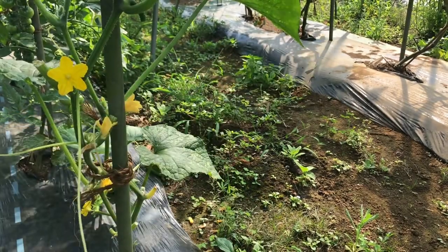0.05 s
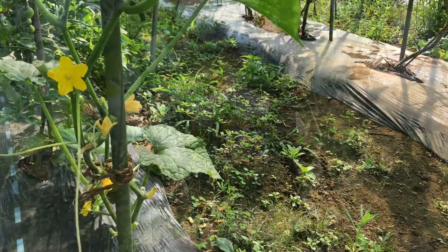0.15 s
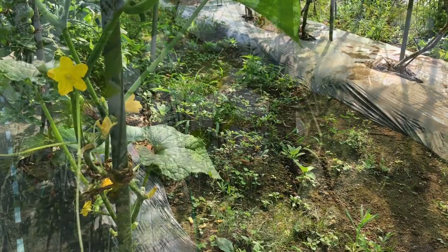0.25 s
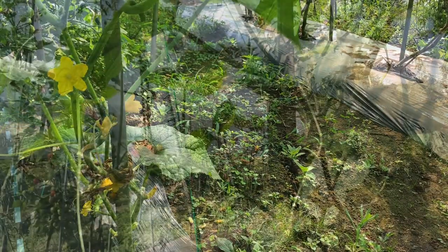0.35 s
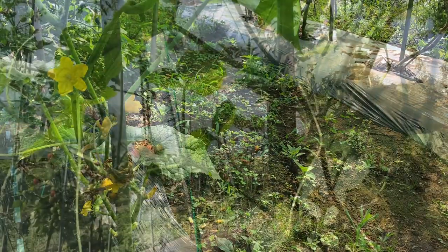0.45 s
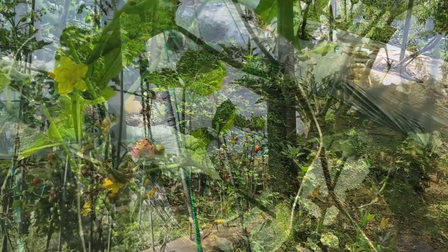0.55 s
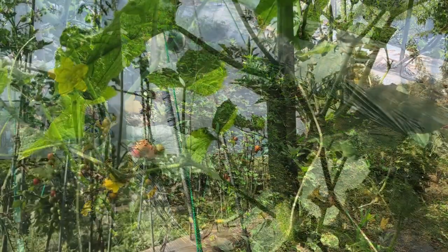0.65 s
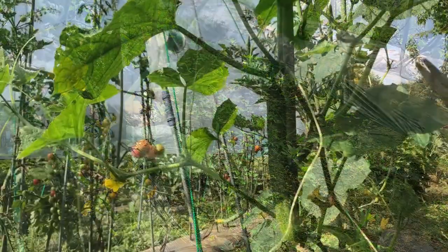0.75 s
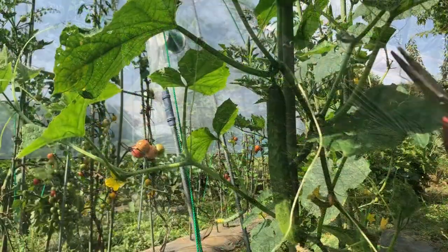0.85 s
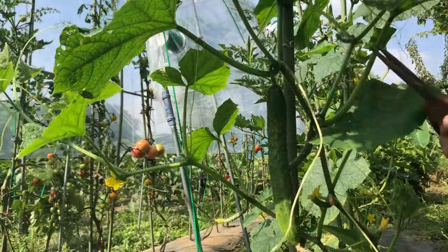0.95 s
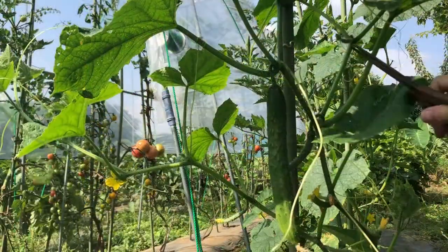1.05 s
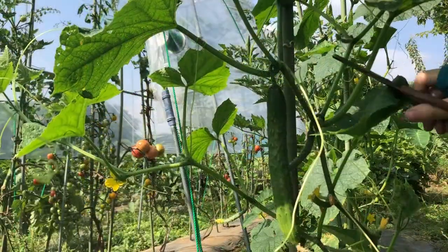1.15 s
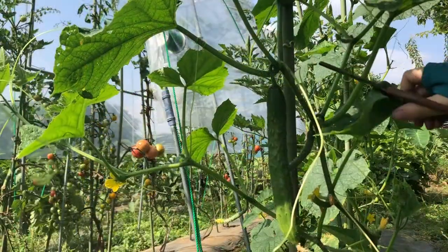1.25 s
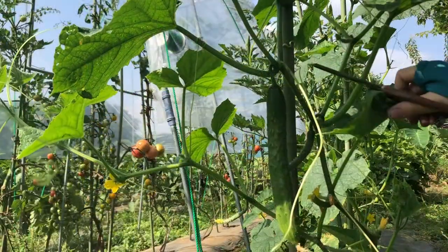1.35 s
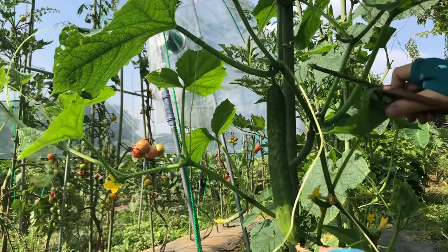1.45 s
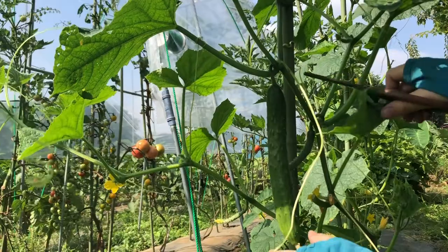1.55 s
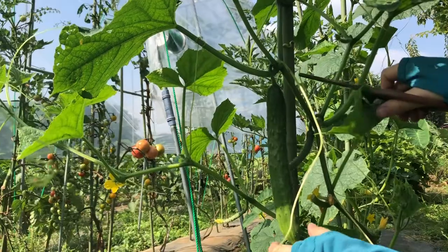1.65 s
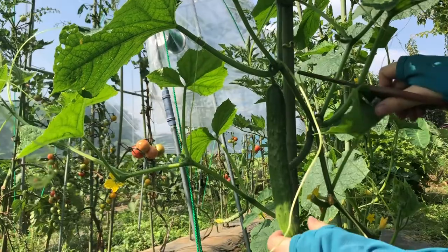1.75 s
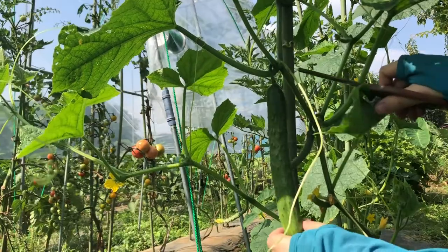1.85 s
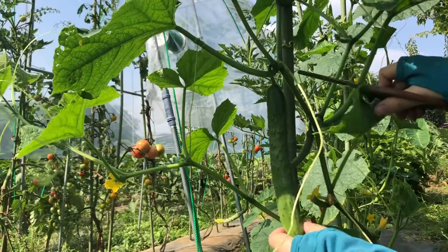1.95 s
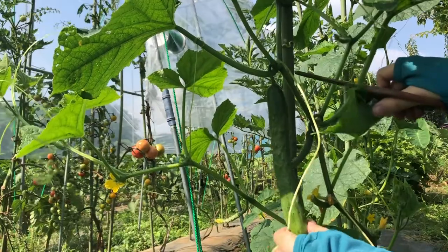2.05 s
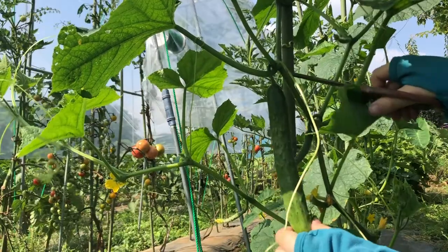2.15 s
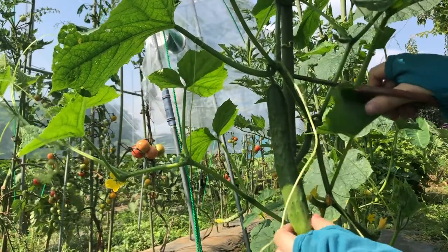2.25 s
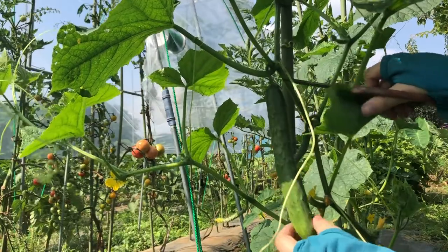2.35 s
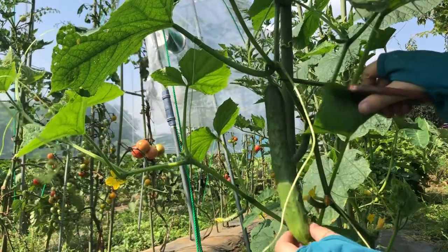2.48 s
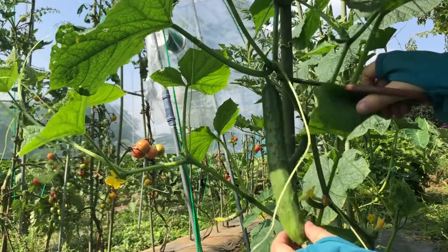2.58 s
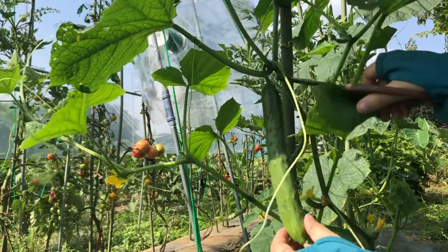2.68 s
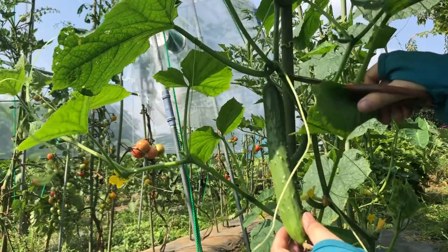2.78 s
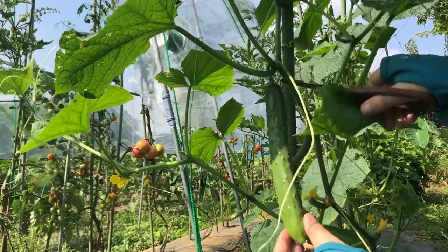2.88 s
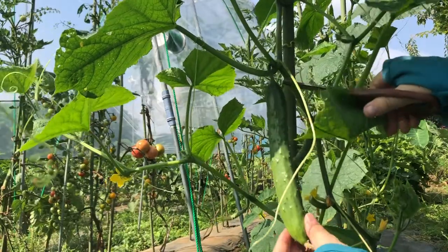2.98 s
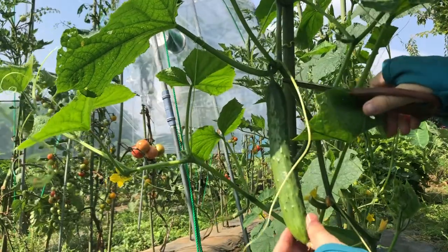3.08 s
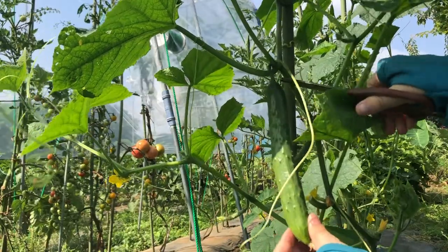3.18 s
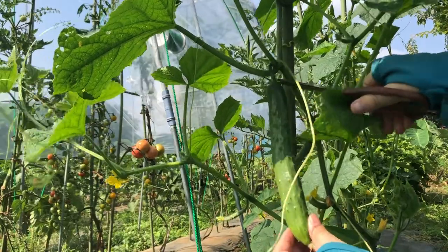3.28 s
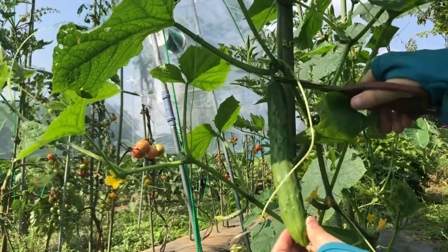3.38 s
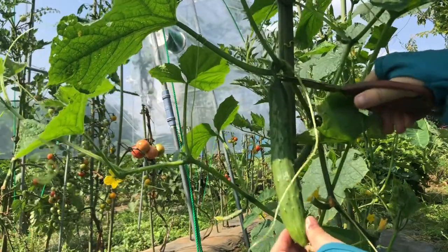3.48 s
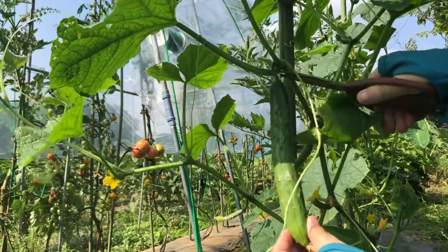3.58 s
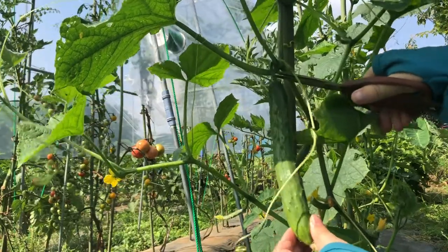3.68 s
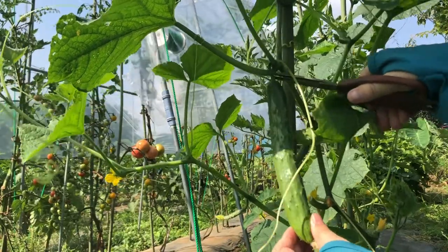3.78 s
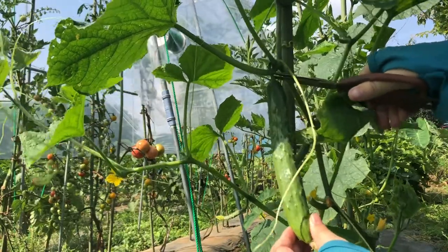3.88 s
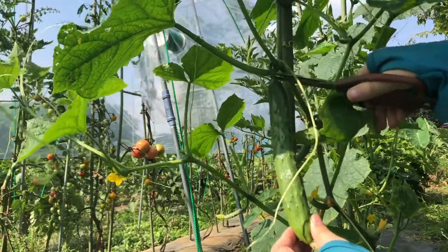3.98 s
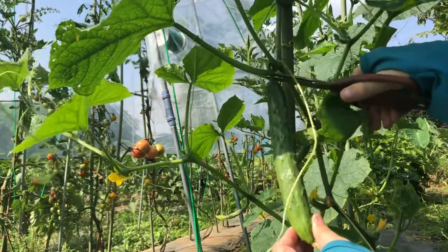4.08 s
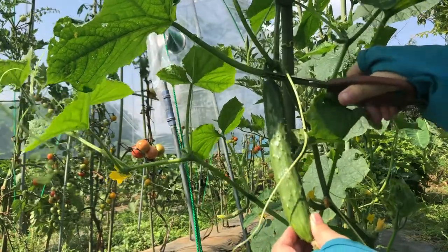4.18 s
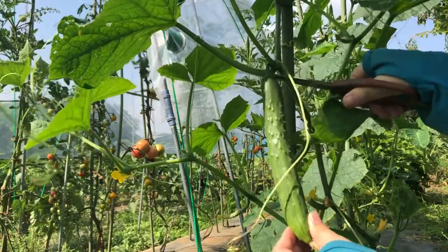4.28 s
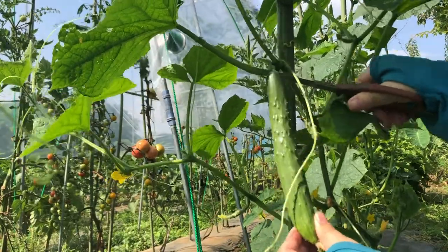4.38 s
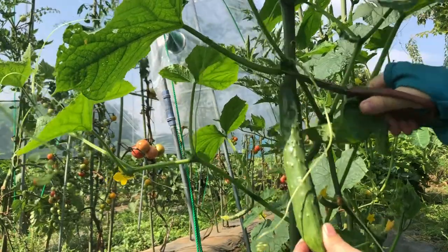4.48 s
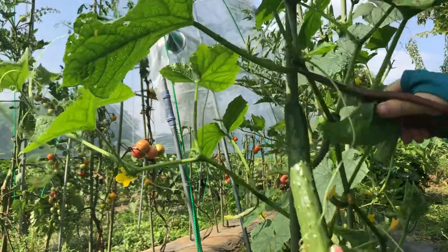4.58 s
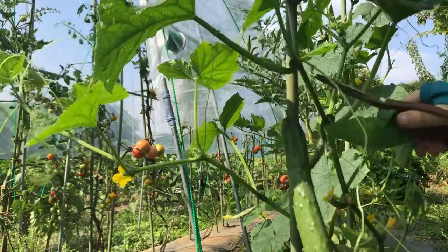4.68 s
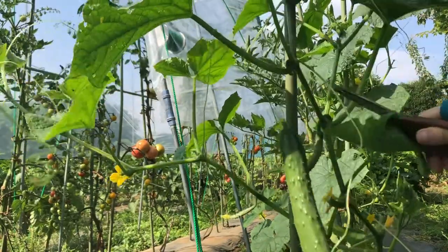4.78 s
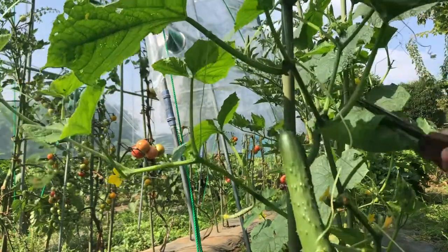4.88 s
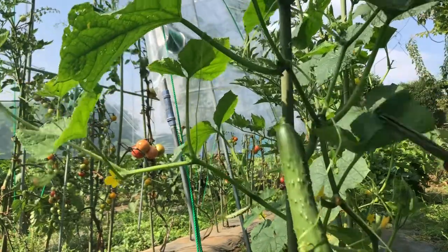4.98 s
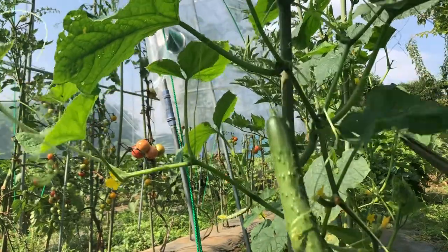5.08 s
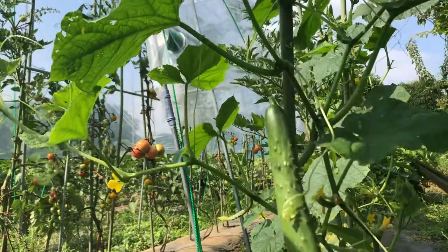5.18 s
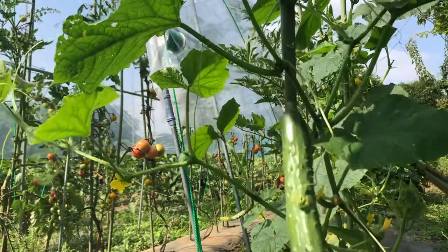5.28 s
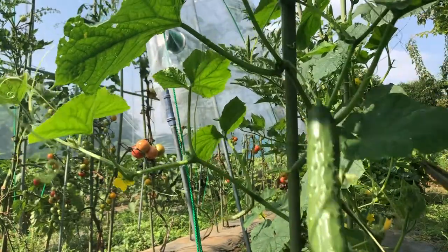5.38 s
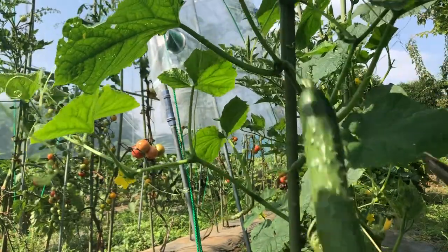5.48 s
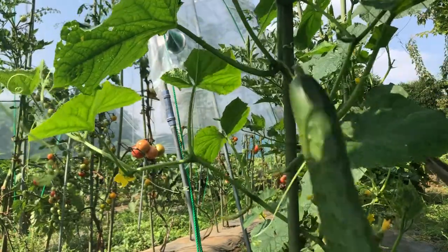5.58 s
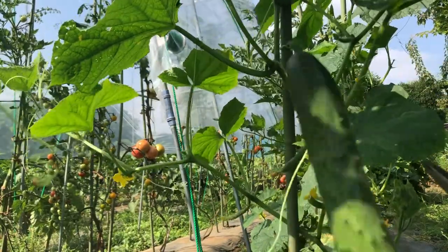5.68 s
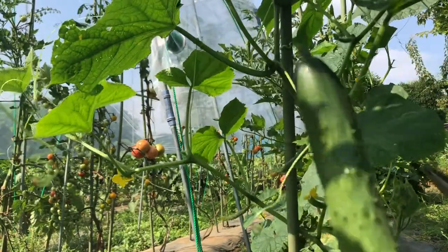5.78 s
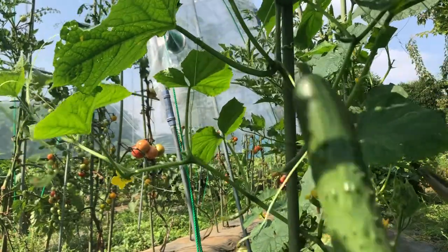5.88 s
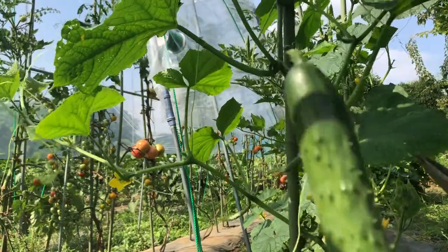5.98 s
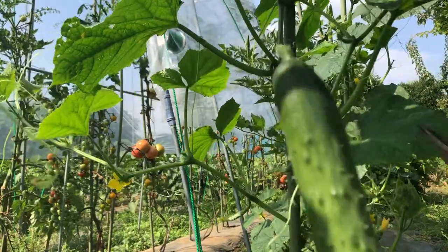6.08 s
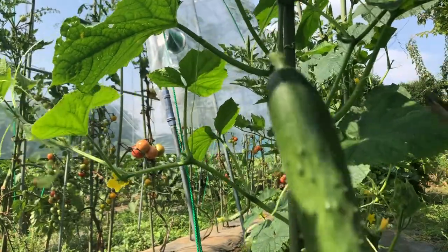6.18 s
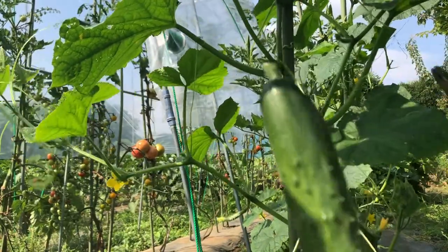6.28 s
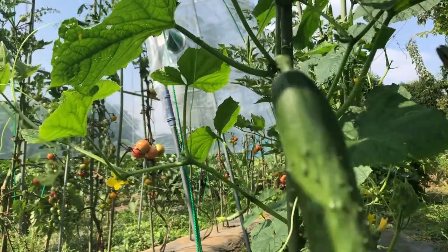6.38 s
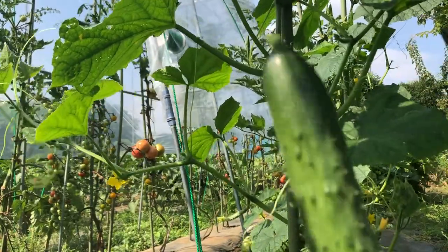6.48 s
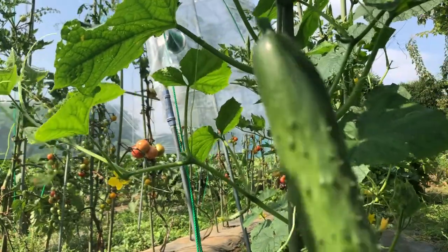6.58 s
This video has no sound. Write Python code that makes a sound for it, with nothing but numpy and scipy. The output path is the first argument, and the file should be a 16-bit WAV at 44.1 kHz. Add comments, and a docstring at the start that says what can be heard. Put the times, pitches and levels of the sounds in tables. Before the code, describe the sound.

A soft rush fades and a far bird calls faintly as insects settle into a fine, even chirr outdoors. Quiet, scratchy rustles and small dry ticks come from a cucumber vine being handled right by the microphone. Past the middle, garden shears crunch through the stem and snap shut once, loud and crisp. A little more leaf crinkling follows, leaving the insects and a low, distant rumble.

```python
"""A summer vegetable garden, one microphone close to a cucumber vine. At first a soft midrange rush fades out
and a far bird calls faintly, while the insect chirr rises to a steady level over a low distant rumble. Sleeves
brush the bristly leaves, stalks tick, and from about 2 s a hand holds and tugs the fruit. At 4.2 s steel shears
crunch through the stalk and snap shut once. The cucumber is drawn out through the leaves and the plant settles."""
import sys
import numpy as np
from scipy.fft import rfft, irfft, next_fast_len
from scipy.io import wavfile
from scipy.ndimage import map_coordinates

SR = 44100
rng = np.random.default_rng(int(sys.argv[2]) if len(sys.argv) > 2 else 0)


def unload_wav(signal):
    """Save mono or channel-first audio to the path in sys.argv[1] as 16-bit WAV at rate SR, clipped to [-1, 1]."""
    wavfile.write(
        sys.argv[1],
        SR,
        np.round(np.clip(np.atleast_2d(signal).T, -1, 1) * 32767).astype(np.int16),
    )


N = 292691

# Spectra of the garden, far off and all around. Each row: frequency in Hz, relative level in dB.
RUMBLE_SPECTRUM = [(20, -39), (32, -14), (48, 0), (75, 1), (105, 1.5), (128, -2.5), (165, 0.5), (210, -8.5),
                   (260, -9.5), (350, -20.5), (600, -43)]
AIR_SPECTRUM = [(150, -12.5), (350, 3.5), (550, 0.5), (1100, -3.5), (1700, -7.5), (2600, -10), (5000, -18),
                (15000, -33)]
OPENING_RUSH_SPECTRUM = [(250, -12), (800, 0), (1500, 6), (2200, -3), (4000, -13), (10000, -26)]
INSECT_SPECTRUM = [(4200, -31), (4900, -18.5), (5400, -7.5), (5850, -2), (6600, -2.5), (7400, -1.5),
                   (8300, -0.5), (9000, -5), (9700, -13.5), (10500, -24), (12000, -49)]
# Tones of a far machine. Each row: frequency in Hz, rms level in dB.
DRONE_TONES = [(167.5, -67.5), (200, -63)]
# Syllables of the far bird. Each row: start in seconds, length in seconds, pitch in Hz, level in dB.
BIRD_SYLLABLES = [(0.515, .1, 980, -62), (0.649, 0.11, 1060, -60), (0.73, 0.089, 1117, -65),
                  (.825, 0.041, 1194, -69)]

# Spectra of the plant, close to the microphone. Each row: frequency in Hz, relative level in dB.
BRUSH_SPECTRUM = [(800, -33), (2500, -12.5), (5000, 3), (7000, 2), (10500, 1), (13000, -1), (15800, -3)]
BRISTLE_SPECTRUM = [(2500, -15), (3400, -14), (3800, 0), (4400, -0.5), (5200, -2.5), (7000, -10),
                    (11000, -32.5)]
LEAF_SPECTRUM = [(300, -10), (900, -10), (1800, -5), (2400, -5.5), (2650, -3.5), (2900, 0.5), (3500, -7),
                 (4100, -6), (6000, -34)]
RASP_SPECTRUM = [(2000, -20), (2900, 0), (3600, -10), (4600, -2), (5400, 0), (6200, -6), (8000, -20)]
RUB_SPECTRUM = [(250, 0), (450, 5), (700, -3), (1200, 1), (1900, -4.5), (3000, -16), (5000, -26)]
CRUNCH_SPECTRUM = [(500, -29), (1000, -25), (1400, -16), (2200, 6), (3200, -3), (4000, -2), (4600, -10),
                   (6000, -2), (9000, 2.5), (11500, -5.5), (15500, 1)]
FOLIAGE_ECHO_SPECTRUM = [(250, -11), (600, 1), (1000, -21), (2200, -11), (4500, -8), (6200, -1), (10500, 0),
                         (13000, 0), (16000, -11)]
# The fruit is tugged, then drawn out. Each row: start in seconds, length in seconds, level in dB.
FRUIT_TUGS = [(1.154, 0.13, -69), (2.78, 0.13, -64), (3.15, 0.067, -66.5), (3.303, .06, -69),
              (4.049, 0.037, -60.5), (4.14, 0.056, -62.5), (4.654, 0.075, -62), (4.897, 0.095, -69),
              (5.817, .13, -67), (6.037, 0.34, -67)]
# Stalks and leaves ticking. Each row: start in seconds, level in dB (the peak lies 1 dB above it),
# pitch in Hz, 60 dB decay time in seconds.
STALK_TICKS = [(.977, -47, 1700, 0.034), (1.708, -44.5, 3200, 0.018), (2.0406, -35, 5100, .009),
               (2.108, -40, 4800, .01), (2.244, -43.5, 3400, 0.016), (2.789, -48, 1600, .015),
               (2.819, -47, 4200, .012), (3.454, -48, 3300, 0.015), (3.623, -45, 4050, .012),
               (4.068, -47, 2130, 0.014), (4.131, -38, 4700, .013), (4.186, -45, 2590, 0.011),
               (4.495, -48, 1900, 0.031), (4.823, -41.5, 3300, .02), (4.919, -41, 2900, .012),
               (4.94, -38, 3000, .012), (4.966, -40, 2900, .015)]
# A big leaf gives way as the hand pushes through the vine. # Each row: start in seconds, length in seconds,
# level in dB.
LEAF_BENDS = [(1.115, .095, -66), (4.9, .085, -56.5)]
# Hand and sleeve moving through the vine. Each row: start in seconds, length in seconds,
# strength of brushing in dB, strength of bristle scraping in dB relative to the brushing.
SLEEVE_STROKES = [(.09, 0.072, -67, 2), (.925, .22, -67, -6), (1.135, .1, -70, 11), (1.28, .12, -73, 1),
                  (1.53, .15, -72, -3), (1.67, .085, -64.5, -2), (2.03, .185, -58, -3.5),
                  (2.24, .07, -58, -4), (2.33, .125, -56.5, -4), (2.47, .25, -64, -2), (2.78, .105, -63, 5),
                  (2.89, .11, -71, 1), (3.135, .09, -63.5, -1), (3.255, .085, -63.5, 4),
                  (3.48, .025, -66, 2), (3.535, .085, -65, 1), (3.66, .15, -70, 2), (3.965, .11, -66, 0),
                  (4.1, .17, -64.5, 0), (4.37, .04, -71, 6), (4.45, .05, -66, -3), (4.51, .11, -72, 7),
                  (4.635, .11, -64, -1), (4.735, .27, -58, -4), (5.05, .15, -74, -3),
                  (5.37, .025, -70, -10), (5.83, .08, -76, 1), (6.01, .11, -72, 2)]
# Edge grinds on edge as the blades meet and rebound.
# Each row: start in seconds, level in dB, 60 dB decay time in seconds.
BLADE_CONTACTS = [(4.2304, -45, 0.0045), (4.232, -18.5, 0.0098)]
# Damped resonances of the shears. Each row: frequency in Hz, width in Hz, level in dB.
CLACK_MODES = [(1291.0, 144.0, -31.0), (2155.0, 247.0, -14.0), (2785.0, 249.0, -22.0),
               (3932.0, 275.0, -15.0), (5230.0, 357.0, -13.0), (6176.0, 499.0, -8.0),
               (7172.0, 239.0, -17.0), (7801.0, 246.0, -17.0), (8384.0, 199.0, -22.0),
               (9055.0, 202.0, -20.0), (9680.0, 158.0, -26.0), (10382.0, 154.0, -23.0),
               (10817.0, 214.0, -20.0), (11632.0, 330.0, -11.0), (13234.0, 263.0, -20.0),
               (13896.0, 268.0, -21.0), (15012.0, 314.0, -23.0)]
# Ringing of handles and blades. Each row: frequency in Hz, level in dB, 60 dB decay time in seconds.
RING_MODES = [(341, -40, 0.08), (2100, -45, 0.056), (4150, -56, .12), (5910, -55, 0.12), (6110, -44, 0.13),
              (7500, -46, 0.087), (10600, -47, 0.1), (10600, -46, .06), (11640, -44, .065)]

GRASP_S, SHUT_S, FREE_S = 2.05, 4.2305, 5.0  # the fruit is gripped, the blades shut, the fruit is free
STROKE_ATTACK_S, STROKE_RELEASE_S, STROKE_ARCH_DB = .035, .17, 2
TOP_HZ = 15900


def amp(db):
    """Decibels to gain."""
    return 10 ** (np.asarray(db) / 20)


def unit(x):
    """Scale to rms 1."""
    return x / np.sqrt(np.mean(x ** 2) + 1e-20)


def wobble(rate):
    """A smooth random curve, rate knots a second."""
    return map_coordinates(rng.standard_normal(int(N * rate / SR) + 4), [np.arange(N) * rate / SR])


def filtered(x, response):
    """Filter x by a gain given as a function of frequency."""
    size = next_fast_len(len(x) + SR // 4)
    return irfft(rfft(x, size) * response(np.fft.rfftfreq(size, 1 / SR)), size)[:len(x)]


def coloured(x, spectrum):
    """x shaped by (Hz, dB) points, at rms 1."""
    points_hz, db = np.transpose(spectrum)
    return unit(filtered(x, lambda hz: amp(np.interp(np.log(hz + 1), np.log(points_hz), db))))


def noise(spectrum, size=N):
    """Coloured noise of rms 1."""
    return coloured(rng.standard_normal(size), spectrum)


def grains(spectrum, rate, spread_db, smooth):
    """Tiny clicks of uneven size, rate a second, on a bed of smooth friction noise; rms 1."""
    clicks = (rng.random(N) < rate / SR) * rng.choice([-1, 1], N)
    sizes = amp(spread_db * np.clip(rng.standard_normal(N), -2, 2))
    return coloured(unit(clicks * sizes) + smooth * rng.standard_normal(N), spectrum)


def add(track, start, sound):
    """Mix a sound into the track at start seconds."""
    track[round(start * SR):][:len(sound)] += sound


def fade(t, t60):
    """A decay that loses 60 dB in t60 seconds."""
    return np.exp(-np.log(1000) * t / t60)


def ramp_down(start_s, end_s):
    """One until start_s, falling evenly to zero at end_s."""
    return np.interp(np.arange(N) / SR, [start_s, end_s], [1, 0])


def stroke(start, length):
    """The gain of one hand movement: a quick rise, fastest in mid-stroke, then a release."""
    t = np.arange(N) / SR - start
    rise = np.clip(t / STROKE_ATTACK_S, 0, 1)
    arch = amp(STROKE_ARCH_DB * (np.sin(np.pi * np.clip(t / length, 0, 1)) - 1))
    return rise * arch * fade(np.clip(t - length, 0, 1), STROKE_RELEASE_S)


def surroundings():
    """Distant rumble and the rush of open air, both louder at first, and a far machine's wavering drone."""
    unrest = ramp_down(0, 0.83)
    rumble = amp(-56.55 + 5.5 * unrest + 0.3 * wobble(8.1)) * noise(RUMBLE_SPECTRUM)
    air = amp(-67.8 + 4 * unrest + 0.42 * wobble(7.8)) * noise(AIR_SPECTRUM)
    drone = np.zeros(N)
    for hz, db in DRONE_TONES:
        gain = np.sqrt(2) * amp(db + 1.1 * wobble(2.99))
        drone += gain * np.sin(2 * np.pi * np.cumsum(hz + 1.48 * wobble(4)) / SR)
    return rumble + air + drone


def opening_rush():
    """A soft midrange rush of background noise fades out in just over a second."""
    return amp(-64) * ramp_down(0, 1.23) ** 0.75 * noise(OPENING_RUSH_SPECTRUM)


def bird():
    """A hoarse call in short syllables, each a little higher, blurred by distance."""
    track = np.zeros(N)
    for start, length, hz, db in BIRD_SYLLABLES:
        arch = np.sqrt(np.abs(np.sin(np.linspace(0, np.pi, round(length * SR)))))
        phase = 2 * np.pi * hz * np.arange(N) / SR
        hoarse = unit(wobble(212) * np.sin(phase) + wobble(218) * np.cos(phase))
        add(track, start, amp(db) * arch * hoarse[:len(arch)])
    return track


def insects():
    """All around the microphone, insects rasp at their own rates and merge into one high, fine chirr."""
    chorus_db = -54 - 3 * ramp_down(0.61, 0.93)
    chirr = np.zeros(N)
    for rate in np.geomspace(70, 300, num=4):
        pulses = np.cos(2 * np.pi * np.cumsum(rate * (1 + .08 * wobble(3))) / SR)
        chirr += (1 + 0.17 * pulses) * rng.standard_normal(N)
    return amp(chorus_db + 0.27 * wobble(13)) * coloured(chirr, INSECT_SPECTRUM)


def bristle_snaps():
    """Single bristles snap under the fingers for as long as the fruit is held on the vine."""
    snaps = grains(BRISTLE_SPECTRUM, rate=22, spread_db=3, smooth=0)
    return amp(-75) * stroke(GRASP_S, FREE_S - GRASP_S) * snaps


def fruit_tugs():
    """The pulled fruit and its stalk rub dully against the vine."""
    track = np.zeros(N)
    rub = grains(RUB_SPECTRUM, rate=400, spread_db=4.5, smooth=.6)
    for start, length, db in FRUIT_TUGS:
        arch = np.sin(np.linspace(0, np.pi, round(length * SR)))
        add(track, start, amp(db) * arch * rub[round(start * SR):][:len(arch)])
    return track


def stalk_ticks():
    """Stalks slip free, each with a dry crack about an octave wide."""
    track, t = np.zeros(N), np.arange(SR // 20) / SR
    for start, db, hz, t60 in STALK_TICKS:
        band = [(hz / 4, -28), (hz / 1.4, -10), (hz, 0), (hz * 1.3, -8), (hz * 3, -19)]
        crack = noise(band, size=len(t)) * fade(t, t60)
        add(track, start, amp(db + 1) * crack / np.abs(crack).max())
    return track


def leaf_bends():
    """A big leaf crinkles as it is pushed aside, and its rough surface rasps along."""
    push = sum(amp(db) * stroke(start, length) for start, length, db in LEAF_BENDS)
    flutter = amp(1.5 * wobble(70))
    crinkle = grains(LEAF_SPECTRUM, rate=400, spread_db=2, smooth=.8)
    rasp = amp(-5) * grains(RASP_SPECTRUM, rate=350, spread_db=3, smooth=.5)
    return push * flutter * (crinkle + rasp)


def handling():
    """How hard the strokes drive brushing, bristles and leaf blades, as three curves in dB."""
    t = np.arange(N) / SR
    # the plant stirs faintly between strokes, more while held, and settles once the fruit is free
    held_db = 3.5 * (t > GRASP_S) - 11 * np.maximum(t - FREE_S, 0)
    brush_power = amp(-80 + 2.5 * wobble(14) + held_db) ** 2
    bristle_power = brush_power * amp(-2) ** 2
    for start, length, db, scrape_db in SLEEVE_STROKES:
        power = (amp(db) * stroke(start, length)) ** 2
        brush_power += power
        bristle_power += power * amp(scrape_db) ** 2
    uneven_db = 1.2 * wobble(40)  # the hand never moves quite evenly
    brush_db, bristle_db = 10 * np.log10([brush_power, bristle_power]) + uneven_db
    leaf_db = -73 + .55 * (brush_db + 65)  # the leaves follow the brushing by about half as many dB
    return brush_db, bristle_db, leaf_db


def vine_rustle():
    """Close by, cloth slides over leaves, bristles catch and slip in clumps, and leaf blades crinkle."""
    brush_db, bristle_db, leaf_db = handling()
    clumps = wobble(70)
    brush = grains(BRUSH_SPECTRUM, rate=1500, spread_db=2.5, smooth=0.89)
    hair_flicks = grains(BRUSH_SPECTRUM, rate=60, spread_db=4, smooth=0)  # stiff hairs spring back
    bristles = grains(BRISTLE_SPECTRUM, rate=390, spread_db=4.5, smooth=0.44)
    leaves = grains(LEAF_SPECTRUM, rate=400, spread_db=0.5, smooth=1.0)
    return (amp(brush_db + 4.5 + 1.1 * clumps) * brush
            + amp(brush_db - 4 + 1.5 * clumps) * hair_flicks
            + amp(bristle_db - 1 + 1.9 * clumps) * bristles
            + amp(leaf_db + 1.3 * wobble(40)) * leaves)


def shears():
    """Near the microphone, blades crunch through the stalk and clack shut; the hand damps the steel."""
    track, t = np.zeros(N), np.arange(SR // 6) / SR
    # the juicy stalk gives way just before the blades meet
    add(track, 4.224, amp(-35.5) * noise(CRUNCH_SPECTRUM, size=len(t)) * fade(t, 0.092))
    for start, db, t60 in BLADE_CONTACTS:
        add(track, start, amp(db) * noise(CRUNCH_SPECTRUM, size=len(t)) * fade(t, t60))
    # the blades slam home: each resonance dies at a speed set by its width
    clack = sum((-1) ** k * amp(db) * np.exp(-np.pi * width * t) * np.cos(2 * np.pi * hz * t)
                for k, (hz, width, db) in enumerate(CLACK_MODES))
    add(track, SHUT_S, clack * (1 - fade(t, .001)))
    # a few lightly damped modes sing on, over the soft knock of the handles
    ring = sum(amp(db) * np.sin(2 * np.pi * hz * t) * fade(t, t60) for hz, db, t60 in RING_MODES)
    add(track, SHUT_S, ring * (1 - fade(t, 0.0073)))
    # foliage scatters the click: near leaves answer at once, the rest of the garden a little longer
    echoes = amp(-33.5) * fade(t, 0.062) + amp(-51) * fade(t, .12)
    add(track, SHUT_S, echoes * (1 - fade(t, 0.017)) * noise(FOLIAGE_ECHO_SPECTRUM, size=len(t)))
    return track


def scene():
    """The garden all around and the picking close by, in mono."""
    garden = insects() + surroundings() + opening_rush() + bird()
    picking = shears() + vine_rustle() + leaf_bends() + fruit_tugs() + stalk_ticks() + bristle_snaps()
    return (garden + picking)[None]


def record(dry):
    """The microphone's channel cuts off steeply above TOP_HZ."""
    return np.array([filtered(x, lambda hz: 1 / np.sqrt(1 + (hz / TOP_HZ) ** 200)) for x in dry])


dry = scene()
out = record(dry)
unload_wav(out)
```